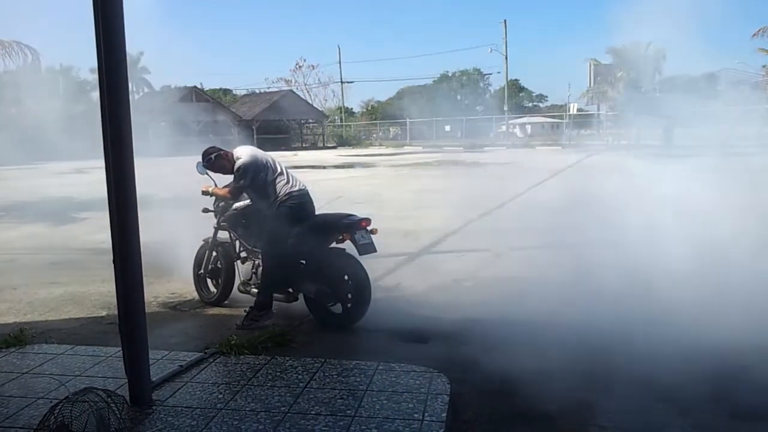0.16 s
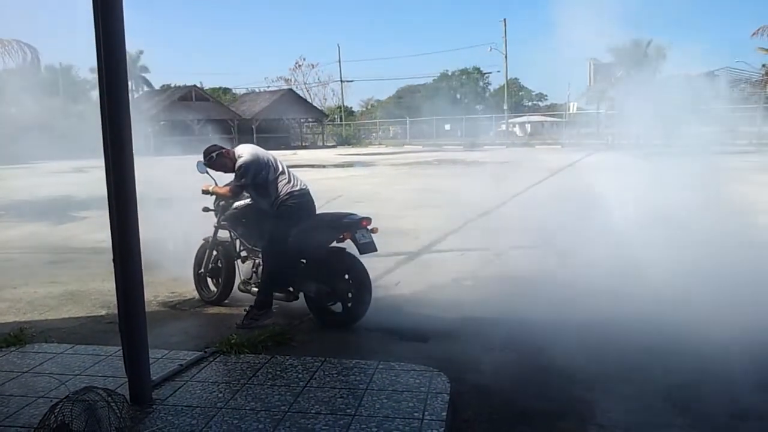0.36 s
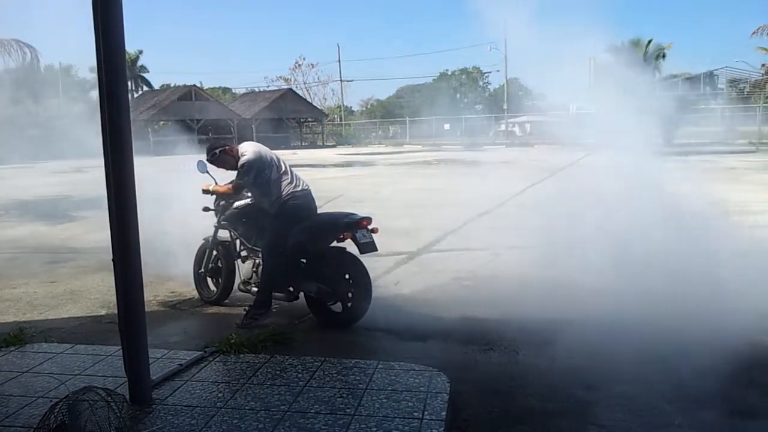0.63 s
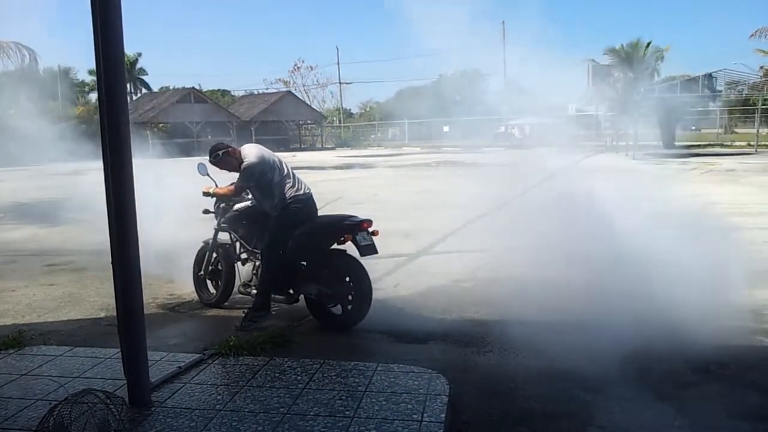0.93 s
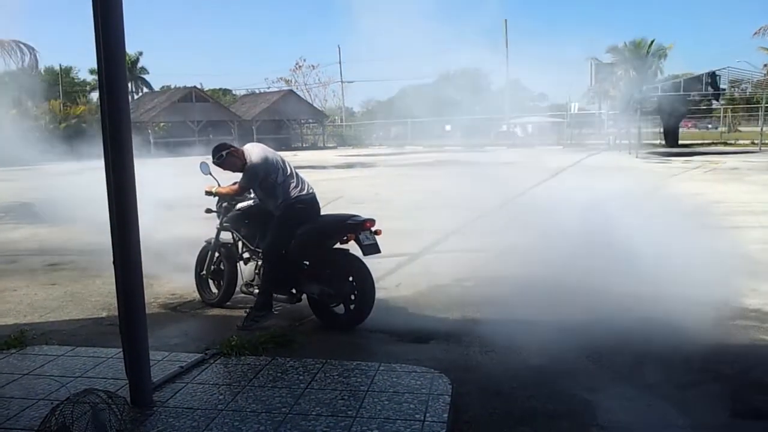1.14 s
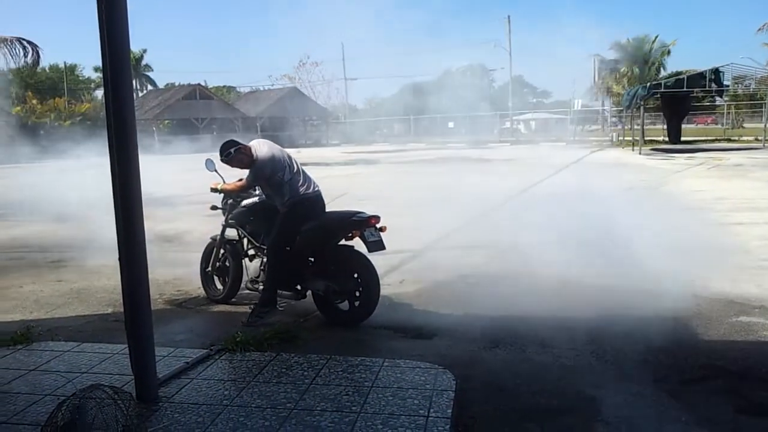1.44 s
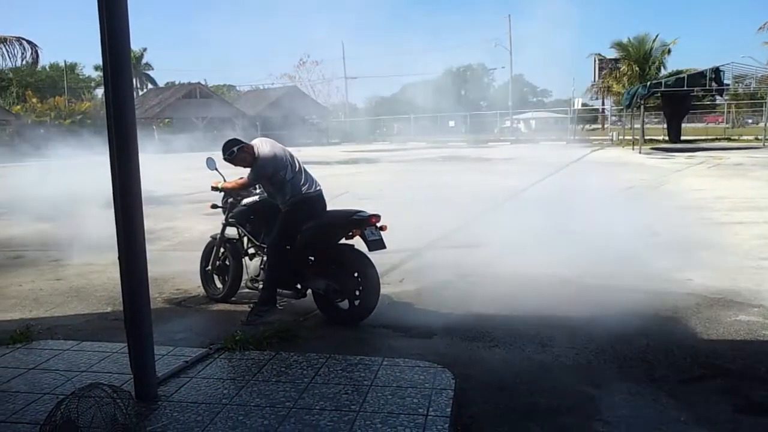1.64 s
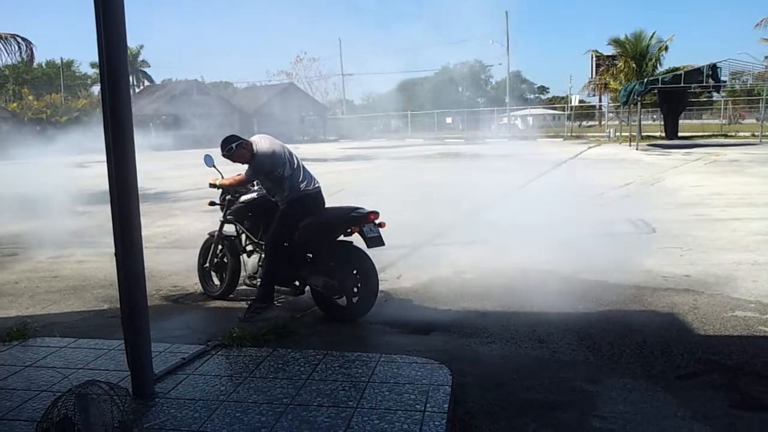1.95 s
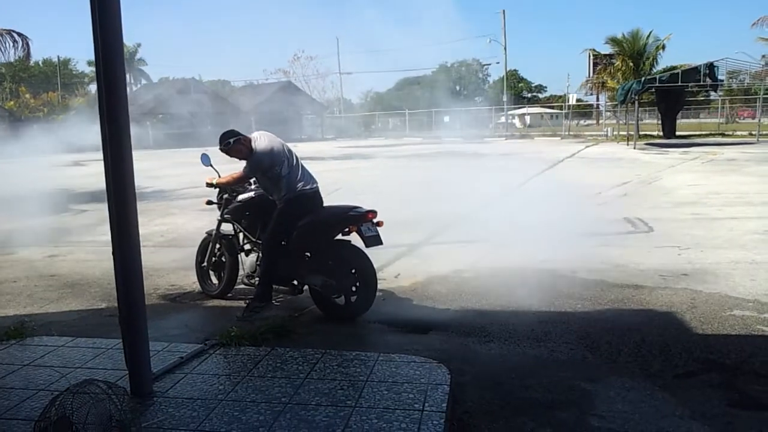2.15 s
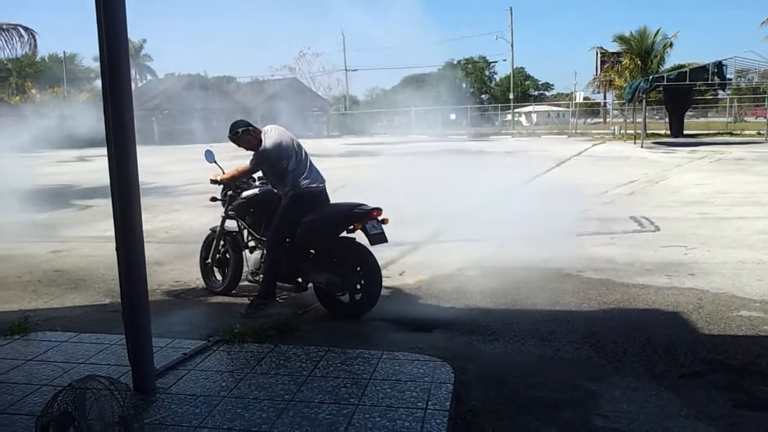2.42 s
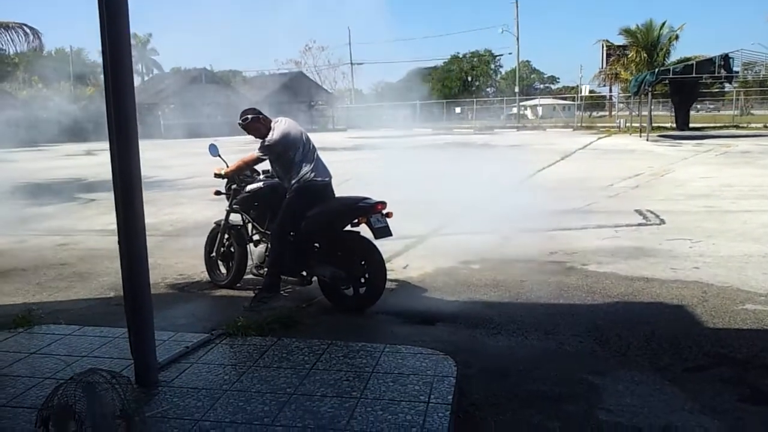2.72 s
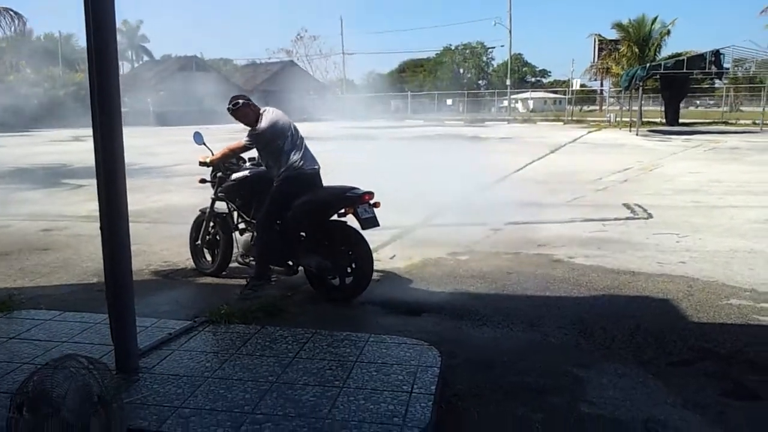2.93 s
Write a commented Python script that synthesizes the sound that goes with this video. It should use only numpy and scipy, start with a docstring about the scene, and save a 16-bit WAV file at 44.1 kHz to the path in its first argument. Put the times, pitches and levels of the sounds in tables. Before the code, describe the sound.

Motorcycle at high revs, a hoarse low exhaust note with hiss and casing clatter, soon fades into separate boomy thumps and sharp gas spits, lumpy to the end, heard by one microphone under a porch.

```python
"""From under a porch, one microphone hears a motorcycle on a paved lot, first at high revs and overloading it.
The pipe holds a note amid rasp and hiss, over the casing's whir and clatter; note, rasp and hiss fade.
Each firing is a pressure thump that rings the exhaust, bounces inside it and booms under the porch.
Spits of gas ring the tailpipe, a few bright puffs of hiss among them, down to a slow, lumpy idle."""
import sys
import numpy as np
from scipy import signal
from scipy.fft import rfft, irfft
from scipy.io import wavfile

SR = 44100
rng = np.random.default_rng(int(sys.argv[2]) if len(sys.argv) > 2 else 0)


def store_pcm(level_fs):
    """Save levels as 16-bit WAV."""
    pcm = np.round(np.clip(level_fs, -1, 1) * 32767).astype(np.int16)
    wavfile.write(sys.argv[1], SR, np.atleast_2d(pcm).T)


N = 135828  # samples, about 3.1 s

# In colour tables only the shape of the spectrum counts; other levels are relative within their layer.

# the pipe's sustained note at high revs: time_s, pitch_hz, level_db
NOTE_PATH = [(0.0, 177, -7.5), (0.04, 180.3, -27), (0.098, 171.5, -3.5), (0.146, 162, -16),
             (0.2, 155.2, -13), (0.235, 155.9, -12), (0.263, 149.1, -16), (0.36, 152, -24),
             (0.409, 156.6, -14), (0.434, 158.5, -19), (0.46, 157.5, -19), (0.51, 156.8, -10),
             (0.608, 166.5, -17.5), (0.66, 166.6, -17)]
NOTE_DB, NOTE_RELEASE_FROM_S, NOTE_RELEASE_S = -4.5, 0.4, 0.033
OVERTONE_RATIO, OVERTONE_DB = 1.91, -5.5

# loudness of the combustion rasp: time_s, level_db
RASP_LEVEL = [(0, -24.5), (.15, -28), (.3, -30), (.5, -26), (.7, -33), (1.1, -48), (3.08, -52)]
# colour of the rasp: pitch_hz, level_db_per_hz
RASP_COLOUR = [(300, -17.5), (700, 6), (1000, -12), (1500, 5.5), (2150, 2), (2800, -19), (5000, -11.5),
               (9000, -16), (14000, -36)]
RASP_PER_S, RASP_SCATTER_DB, RASP_RISE_S, RASP_DECAY_S = 170, 5, 0.00088, 0.0026

# loudness of the engine's whir and clatter: time_s, level_db
RUNNING_LEVEL = [(0.0, -12.5), (0.48, -19), (0.82, -20.5), (0.86, -15.5), (0.88, -20), (1.94, -22.5),
                 (2.98, -20), (3.06, -21.5), (3.08, -18)]
# colour of the engine casing: pitch_hz, level_db_per_hz
CASING_COLOUR = [(200, -4), (320, 0.5), (390, -8.5), (480, -10), (535, 3.5), (590, -2), (650, 1),
                 (720, -0.5), (900, -8), (1150, -9), (1380, -7), (1650, -12), (2000, -10.5), (2600, -20.5),
                 (3300, -24), (4300, -17.5), (5000, -25), (7000, -30.5), (9000, -60), (11000, -100)]
WHIR_DB, CLATTER_DB, CLATTER_PER_S, CLATTER_SCATTER_DB = -4.5, -11.5, 260, 5

# loudness of the exhaust flow's hiss: time_s, level_db
FLOW_LEVEL = [(0, -25), (.2, -25), (.4, -34), (.6, -39.5), (1.0, -51), (1.5, -81), (3.08, -72)]
# colour of the hiss: pitch_hz, level_db_per_hz
HISS_COLOUR = [(1500, 8.5), (3000, -3.5), (5000, -1.5), (7500, -2), (10500, -13), (13000, -5.5),
               (15500, -19)]

# colour of the boom that lingers under the porch: pitch_hz, level_db_per_hz
BOOM_COLOUR = [(25, -79.5), (42, -53.5), (62, 23), (75, -1), (92, 16.5), (125, -6.5), (165, 9), (215, 1),
               (275, -12), (313, -1.5), (390, -13), (600, -67.5)]
BOOM_DB, BOOM_RISE_S, BOOM_DECAY_S, DRONE_DB = -17.5, 0.015, 0.027, -24

# exhaust pressure pulses, one per firing: start_s, level_db
FIRINGS = [(0.0015, 1.5), (0.0227, 0), (0.0468, -13), (0.0584, 1), (0.0819, 1.7), (0.0978, -13.5),
           (0.1111, -1), (0.1239, -7), (0.136, -1), (0.1486, -10.8), (0.1615, -1), (0.1749, -3),
           (0.1923, -3.5), (0.2069, -5), (0.2391, -5.5), (0.252, -6.5), (0.2665, -4), (0.3, -3.5),
           (0.3295, -8), (0.3758, 0.5), (0.3998, -11.8), (0.4213, -6.5), (0.4454, -1.8), (0.4845, -5.5),
           (0.5157, -2.5), (0.5581, -2), (0.582, -6), (0.6038, -6.6), (0.6278, -10), (0.656, -16),
           (0.6797, -5.5), (0.72, -4.9), (0.7438, -15.5), (0.7645, -12.2), (0.7881, -15.4), (0.8284, -3),
           (0.8924, -7), (0.9286, -5), (0.9885, -7), (1.0313, -3), (1.0858, -6.5), (1.1295, -10),
           (1.1875, -10.5), (1.2373, -4), (1.2963, -7), (1.3356, -14), (1.4054, -6), (1.454, -8),
           (1.5169, -8.5), (1.5647, -12.4), (1.631, -6.5), (1.6721, -9.5), (1.8005, -8.5), (1.8699, -3.5),
           (1.977, -12), (2.04, -5), (2.1062, -6), (2.149, -12), (2.2225, -5.5), (2.2722, -5),
           (2.3321, -18), (2.4533, -6.5), (2.5037, -5.5), (2.5652, -9.5), (2.6188, -13.5), (2.688, -6),
           (2.7373, -8.5), (2.8006, -12.5), (2.852, -8.5), (2.9195, -5.5), (2.967, -8.5), (3.0324, -12.5)]
SILENCER_HZ, SILENCER_WIDTH_HZ, SILENCER_DB = 91, 20.6, 0.5
# exhaust resonances: pitch_hz, width_hz, signed_gain (ratio)
PIPE_MODES = [(65.2, 4.1, -1.63), (87, 20.5, -0.43), (88.2, 18.9, 0.76), (167.5, 20.2, 0.76),
              (318, 54, -0.075), (549, 16, 0.13)]
# paths through the exhaust: delay_s, gain (ratio; an open end inverts the wave)
PIPE_PATHS = [(0, 0.78), (0.0122, -1.64), (0.0188, -1.2), (0.056, 0.21)]

KICK_DB, KICK_LAG_S, KICK_WIDTH_S = -7, 0.0041, 0.0012

THROB_FROM_HZ, THROB_TO_HZ, THROB_S = 58, 68.94, 0.077  # fundamental, not itself sounded
# overtones of a throb: multiple (of the fundamental), level_db
THROB_OVERTONES = [(5, -22), (9, -31.5), (11, -33)]

KNOCK_DB, KNOCK_RISE_S, KNOCK_DECAY_S = -22.5, 0.0045, 0.05

# sharp spits of gas, the clearly audible ones: start_s, level_db
SPITS = [(0.0155, -32), (0.0666, -23), (0.0874, -14), (0.144, -18), (0.172, -16.5), (0.259, -19.5),
         (0.3197, -22.5), (0.4513, -16), (0.5046, -18.5), (0.524, -17.5), (0.562, -23), (0.6744, -20),
         (0.72, -21.5), (0.7567, -20.5), (0.8442, -15), (0.9096, -22), (1.028, -21), (1.0393, -16),
         (1.1315, -21), (1.1697, -24), (1.2136, -33), (1.2365, -19.5), (1.293, -18), (1.3337, -21),
         (1.403, -23), (1.4528, -16), (1.517, -23.5), (1.565, -22.5), (1.6309, -21.5), (1.6766, -22.5),
         (1.798, -25), (1.8678, -12.5), (1.916, -18), (2.0385, -14.5), (2.106, -16.5), (2.151, -14.5),
         (2.214, -18), (2.2716, -15), (2.382, -16), (2.453, -19), (2.4938, -20.5), (2.5009, -18.5),
         (2.617, -19), (2.6865, -14.5), (2.7354, -15), (2.849, -18.5), (2.9181, -16), (2.967, -17.5),
         (3.023, -27)]
# colour of the gas at the pipe's mouth: pitch_hz, level_db_per_hz
GAS_COLOUR = [(400, 1.5), (600, 1.5), (1000, 2.5), (1500, 3.5), (2050, 5.5), (2600, -11), (3050, -1),
              (3330, -21), (3650, -8.5), (4000, 7), (4350, 2), (4900, -8), (7000, -6), (9000, -18.5),
              (11000, -44.5), (13500, -37)]
SPIT_DB, SPIT_RISE_S, SPIT_DECAY_S = -6, 0.001, 0.0018
RUSH_DB, RUSH_LEAD_S, RUSH_RISE_S, RUSH_DECAY_S = -12.5, 0.0064, 0.009, 0.015

# ringing metal of the tailpipe: pitch_hz, width_hz, level_db
TAILPIPE_MODES = [(1964, 66, -5.5), (3397, 48, -11.5), (4140, 15, -18.5), (4360, 150, -6.5),
                  (6200, 220, -20)]
TAILPIPE_DB, TAILPIPE_SCATTER_DB = -3.5, 3.5

# brighter puffs of hiss: start_s, level_db
PUFFS = [(.449, -31.5), (0.67, -30.5), (.843, -34), (0.935, -26), (.954, -28), (1.344, -35.5),
         (1.866, -37.5), (2.036, -38), (2.103, -38), (2.268, -32.5)]
# colour of the puffs: pitch_hz, level_db_per_hz
PUFF_COLOUR = [(2000, -6), (5000, 4.5), (7500, 6), (10000, -4.5), (14000, -4)]
PUFF_RISE_S, PUFF_DECAY_S = 0.0041, 0.0078

# microphone: bass cut, hardness of the overload bend (exponent), upper limit
MIC_CUT_HZ, CLIP_KNEE, TOP_HZ = 46.4, 5.1, 15700


def undb(db):
    """Amplitude ratio for a level in dB."""
    return 10 ** (np.asarray(db) / 20)


def unit(x):
    """Scale a sound to rms 1."""
    return x / np.sqrt(np.mean(x ** 2))


def fade(rows):
    """Gain that follows (time_s, level_db) points."""
    return undb(np.interp(np.arange(N) / SR, *np.array(rows).T))


def colour(x, points):
    """Causal minimum-phase filter through (pitch_hz, level_db) points; the result has rms 1."""
    size = 8192
    hz, db = np.array(points).T
    bin_hz = np.arange(size // 2 + 1) * SR / size
    gain_db = np.interp(np.log(bin_hz + 1), np.log(hz), db)
    # folding the cepstrum forward puts the whole response after its impulse
    cepstrum = irfft(np.log(undb(gain_db)))
    cepstrum[1:size // 2] *= 2
    cepstrum[size // 2 + 1:] = 0
    response = irfft(np.exp(rfft(cepstrum)))
    run_in = np.r_[x[-size:], x]  # lets the filter settle before the start
    return unit(signal.fftconvolve(run_in, response)[size:size + N])


def noise(points):
    """Steady noise of a given colour, rms 1."""
    return colour(rng.standard_normal(N), points)


def resonate(x, hz, width_hz):
    """One resonance, gain 1 at its centre."""
    return signal.lfilter(*signal.iirpeak(hz, hz / width_hz, fs=SR), x)


def pulses(times, sizes):
    """One impulse at each time."""
    samples = np.clip(np.asarray(times) * SR, 0, N - 1).astype(int)
    return np.bincount(samples, sizes, N)


def bursts(times, db, rise_s, decay_s):
    """Envelope of overlapping bursts that swell and die away; their powers add."""
    t = np.arange(SR // 2) / SR
    shape = (1 - np.exp(-t / rise_s)) ** 2 * np.exp(-t / decay_s)
    power_shape = (shape / shape.max()) ** 2
    power = signal.fftconvolve(pulses(times, undb(db) ** 2), power_shape)[:N]
    return np.sqrt(np.maximum(power, 0))


def pipe_note():
    """Fast firings keep the pipe sounding; its note sags, then climbs a little as it dies away."""
    t = np.arange(N) / SR
    times, hz, db = np.array(NOTE_PATH).T
    phase = 2 * np.pi * np.cumsum(np.interp(t, times, hz)) / SR
    release = np.exp(-np.maximum(t - NOTE_RELEASE_FROM_S, 0) / NOTE_RELEASE_S)
    gain = undb(np.interp(t, times, db) + NOTE_DB) * release
    overtone = undb(OVERTONE_DB) * np.sin(OVERTONE_RATIO * phase)
    return np.sqrt(2) * gain * (np.sin(phase) + overtone)


def rasp():
    """Coarse grains of burning gas at random moments, fading as the engine runs down."""
    chance = rng.random((int(RASP_PER_S * N / SR), 2))
    times = chance[:, 0] * N / SR
    grain_db = RASP_SCATTER_DB * (2 * chance[:, 1] - 1)
    grains = bursts(times, grain_db, RASP_RISE_S, RASP_DECAY_S)
    return fade(RASP_LEVEL) * noise(RASP_COLOUR) * unit(grains)


def machinery():
    """Gears whir and valve gear ticks at random into the resonances of the casing."""
    chance = rng.random((int(CLATTER_PER_S * N / SR), 2))
    # many weak ticks and a few strong ones
    tick_db = -CLATTER_SCATTER_DB * np.log(0.066 + chance[:, 1])
    ticks = pulses(chance[:, 0] * N / SR, undb(tick_db))
    whir = undb(WHIR_DB) * noise(CASING_COLOUR)
    clatter = undb(CLATTER_DB) * colour(ticks, CASING_COLOUR)
    return fade(RUNNING_LEVEL) * (whir + clatter)


def hiss():
    """Turbulent exhaust flow makes a noise that dies away as the revs fall."""
    return noise(HISS_COLOUR) * fade(FLOW_LEVEL)


def boom():
    """Diffuse low sound under the porch hangs on after each thump, over a faint drone."""
    times, db = np.array(FIRINGS).T
    swell = bursts(times, db + BOOM_DB, BOOM_RISE_S, BOOM_DECAY_S)
    return noise(BOOM_COLOUR) * np.hypot(swell, undb(DRONE_DB))


def thumps():
    """Pressure pulses swing the silencer, ring the pipe and bounce between its ends."""
    times, db = np.array(FIRINGS).T
    # dividing by the width offsets the weaker response of a narrow resonance
    push = pulses(times, undb(db + SILENCER_DB)) * SR / (2 * SILENCER_WIDTH_HZ)
    swing = resonate(push, SILENCER_HZ, SILENCER_WIDTH_HZ)
    ring = sum(gain * resonate(swing, hz, width) for hz, width, gain in PIPE_MODES)
    t = np.arange(N) / SR
    return sum(gain * np.interp(t - lag, t, ring, left=0) for lag, gain in PIPE_PATHS)


def kicks():
    """Each pulse leaves the pipe with one sharp swing of pressure."""
    times, db = np.array(FIRINGS).T
    u = (np.arange(SR // 20) / SR - KICK_LAG_S) / KICK_WIDTH_S
    swing = (u ** 2 - 1) * np.exp(-u ** 2 / 2)
    return signal.fftconvolve(pulses(times, undb(db + KICK_DB)), swing)[:N]


def throbs():
    """Firings kick the crank faster, so the overtones of each throb slide up in pitch."""
    t = np.arange(N) / SR
    out = 0
    for start, db in FIRINGS:
        along = np.clip((t - start) / THROB_S, 0, 1)  # 0 to 1 through the throb
        mean_hz = THROB_FROM_HZ + (THROB_TO_HZ - THROB_FROM_HZ) * along / 2
        phase = 2 * np.pi * THROB_S * along * mean_hz
        tone = sum(undb(gain_db) * np.sin(k * phase) for k, gain_db in THROB_OVERTONES)
        swell = np.sqrt(np.abs(np.sin(np.pi * along)))
        out = out + undb(db) * swell * tone
    return out


def knock():
    """Each firing also shakes the casing, a short burst of noise in its colour."""
    times, db = np.array(FIRINGS).T
    return noise(CASING_COLOUR) * bursts(times, db + KNOCK_DB, KNOCK_RISE_S, KNOCK_DECAY_S)


def gas():
    """Sharp spits of gas, each inside a softer turbulent rush that starts just ahead of it."""
    times, db = np.array(SPITS).T
    spit = bursts(times, db + SPIT_DB, SPIT_RISE_S, SPIT_DECAY_S)
    rush = bursts(times - RUSH_LEAD_S, db + RUSH_DB, RUSH_RISE_S, RUSH_DECAY_S)
    return noise(GAS_COLOUR) * np.hypot(spit, rush)


def tailpipe():
    """Each spit rings the tailpipe with a slightly different mix of its modes."""
    times, db = np.array(SPITS).T
    scatter = TAILPIPE_SCATTER_DB * rng.standard_normal((len(times), len(TAILPIPE_MODES))).T
    out = 0
    for (hz, width, gain_db), chance_db in zip(TAILPIPE_MODES, scatter):
        jet_width = hz / 10
        jet = unit(resonate(rng.standard_normal(N), hz, jet_width))
        push = jet * bursts(times, db + gain_db + chance_db, SPIT_RISE_S, SPIT_DECAY_S)
        # the root makes up for the power a narrow mode leaves out
        out = out + resonate(push, hz, width) * np.sqrt(jet_width / width)
    return undb(TAILPIPE_DB) * out


def puffs():
    """A few short puffs of turbulent exhaust, brighter than the steady hiss."""
    times, db = np.array(PUFFS).T
    return noise(PUFF_COLOUR) * bursts(times, db, PUFF_RISE_S, PUFF_DECAY_S)


def scene():
    """The whole motorcycle at one microphone, where the pressures of all its sounds add."""
    running = pipe_note() + rasp() + machinery() + hiss()
    firing = boom() + thumps() + kicks() + throbs() + knock()
    spitting = gas() + tailpipe() + puffs()
    return (running + firing + spitting)[None]


def record(dry):
    """The microphone drops the deepest bass, flattens the loudest swings and cuts the top."""
    bass_cut = signal.butter(4, MIC_CUT_HZ, "high", fs=SR, output="sos")
    thin = signal.sosfilt(bass_cut, dry)
    clipped = thin / (1 + np.abs(thin) ** CLIP_KNEE) ** (1 / CLIP_KNEE)
    top_cut = signal.ellip(10, .2, 80, TOP_HZ, fs=SR, output="sos")  # 0.2 dB ripple, 80 dB stop
    return signal.sosfilt(top_cut, clipped)


dry = scene()
out = record(dry)
store_pcm(out)
```